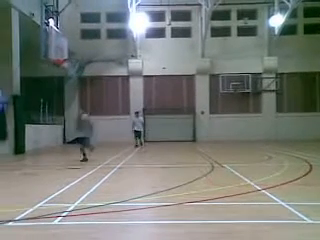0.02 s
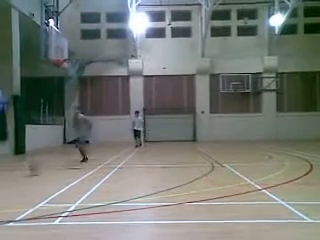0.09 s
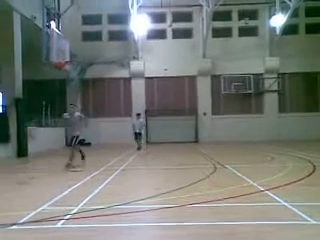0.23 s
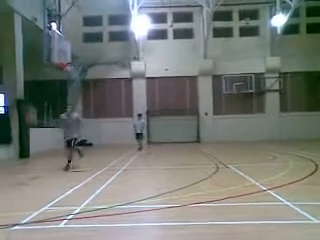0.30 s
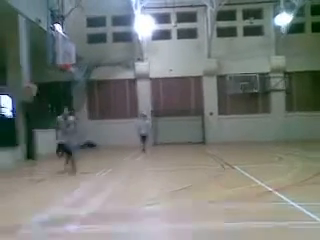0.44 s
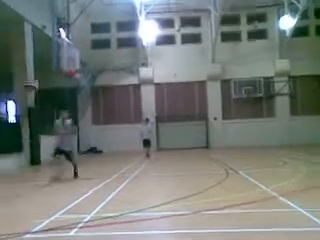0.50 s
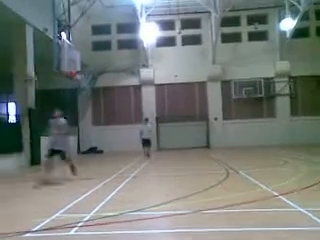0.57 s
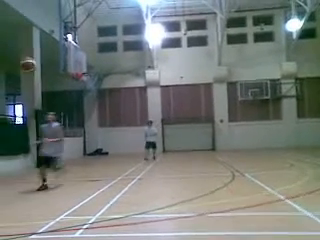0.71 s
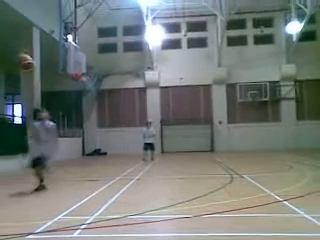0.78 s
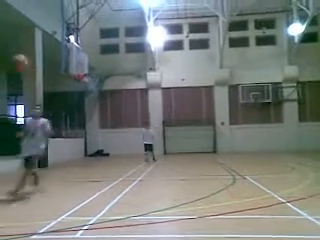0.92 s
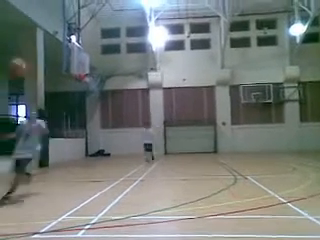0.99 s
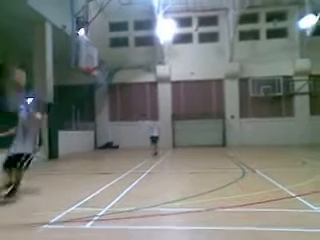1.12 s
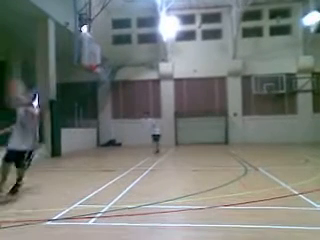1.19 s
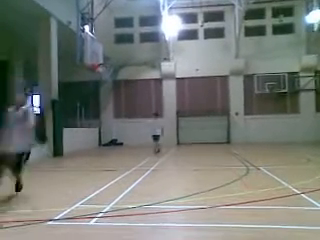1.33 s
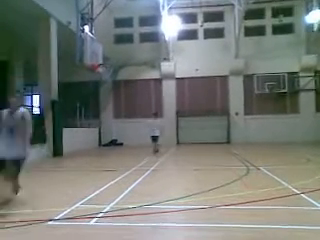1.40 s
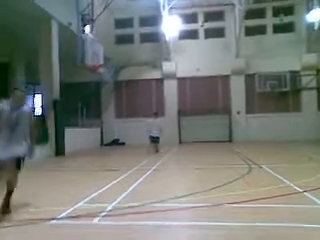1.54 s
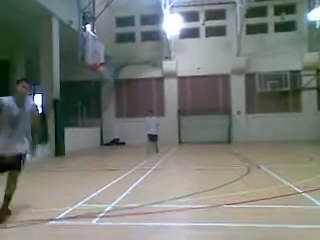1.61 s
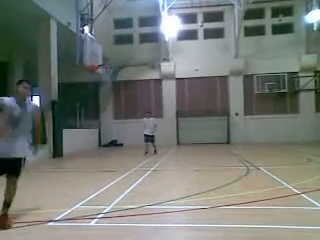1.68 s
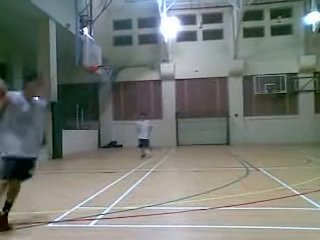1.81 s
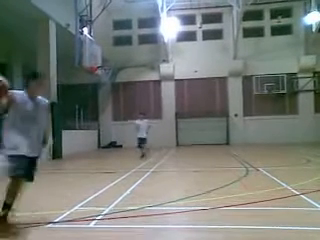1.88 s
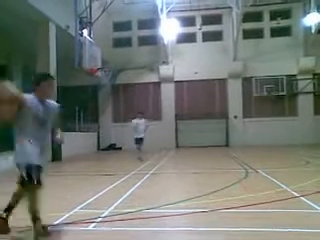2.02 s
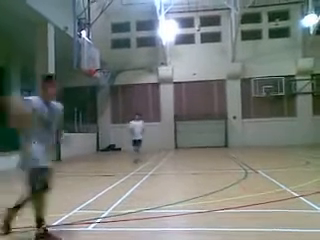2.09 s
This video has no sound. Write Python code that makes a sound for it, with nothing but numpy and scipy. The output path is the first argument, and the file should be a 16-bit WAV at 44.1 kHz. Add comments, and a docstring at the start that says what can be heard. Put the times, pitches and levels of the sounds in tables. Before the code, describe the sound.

A basketball bounces twice on a hard gym floor, with running footsteps and a shoe squeak.

```python
"""A basketball bounces twice on the hard floor of a large gym; a player runs up and a shoe squeaks.
A faint scuff, then the first bounce: noise slap, decaying-sine thump, ringing ball modes, two wall echoes.
Steps follow as noise taps, low sine thuds and board modes, with one more scuff between them.
The second bounce comes just after the last steps; then a jittered harmonic chirp with rubbing noise squeaks.
The hall, decaying noise, rings on for about two seconds; a slowly sinking noise wash lies under it all."""
import sys
import numpy as np
from scipy import signal
from scipy.fft import rfft, irfft
from scipy.io import wavfile
from scipy.ndimage import uniform_filter1d

SR = 44100
rng = np.random.default_rng(int(sys.argv[2]) if len(sys.argv) > 2 else 0)


def persist_wave(psi):
    """Save psi, clipped to +-1, as 16-bit WAV."""
    counts = np.round(np.clip(psi, -1, 1) * 32767).astype(np.int16)
    wavfile.write(sys.argv[1], SR, np.atleast_2d(counts).T)


N = 97020

# bounces: start [t/s], slap [level/dB], thump [level/dB], thump [f/Hz], ring [level/dB],
# near-wall lag [t/s], near-wall echo [level/dB], far-wall echo [level/dB],
# slap to hall [level/dB], thump to hall [level/dB]
BOUNCES = [(0.2088, -10, -5, 99.3, -26, 0.0123, -6, -9, 7.5, -1),
           (1.5314, -11.5, -7.5, 97.2, -25.5, 0.0172, -5, -22, 7, -2.5)]
# slap spectrum: [f/Hz], [level/dB]
SLAP_COLOUR = [(40, 6.5), (230, 9.5), (420, 2.5), (700, 11.5), (1100, 9), (1600, 8.5), (2700, 5.5),
               (3800, -3.5), (5600, 5.5), (7500, -1.5), (9500, -8.5)]
# modes of the ball's shell and air: [f/Hz], [level/dB], t60 [t/s]
BALL_MODES = [(237.8, 3, 0.12), (273, -6.5, 0.098), (392, -0.5, 0.1), (612, -3.5, 0.2), (699, -5.5, 0.15),
              (827, -8, 0.29), (942, -4.5, 0.12), (1010, -5.5, .25), (1054, -1, 0.12), (1144, -4, 0.21),
              (1463, -33.5, 0.32), (1664, -12, 0.16), (1787, -9.5, 0.18), (2160, -23, 0.16),
              (2710, -7.5, 0.12)]
# step contacts and their close echoes, in time order:
# start [t/s], tap [level/dB], tap decay [t/s], thud [level/dB], thud [f/Hz],
# knock [level/dB], knock low-pass [f/Hz], board ring [level/dB], send to hall [level/dB]
STEPS = [(0.755, -29.5, 0.0022, -70, 121, -57, 1000, -75, -6),
         (0.7751, -16.5, 0.0023, -50, 240, -35.5, 1500, -49, -9),
         (1.1012, -32, 0.0042, -20, 99, -18, 550, -64, -6),
         (1.114, -30.5, 0.0021, -43, 110, -34, 1500, -58, -6),
         (1.413, -28, 0.0018, -58, 120, -60, 1000, -70, -26),
         (1.4350, -13.5, 0.003, -13, 140, -15, 1800, -27, -10),
         (1.4510, -36, .003, -33, 200, -25, 2500, -29, -9),
         (1.4700, -44, .003, -29, 150, -29, 500, -37, -8)]
# sole tap spectrum: [f/Hz], [level/dB]
TAP_COLOUR = [(100, -7.5), (500, 10.5), (1200, -3.5), (1900, 8.5), (2800, -0.5), (3700, -8.5), (5600, 8),
              (7000, 2), (10000, -8.5)]
# board knock spectrum: [f/Hz], [level/dB]
KNOCK_COLOUR = [(35, 13), (110, 4.5), (260, 14), (480, 8), (750, 5), (1000, 12), (1350, 4.5), (3000, -20),
                (9000, -31)]
# modes of the floorboards: [f/Hz], [level/dB], t60 [t/s]
BOARD_MODES = [(268, 2.5, 0.1), (322.6, -4, 0.07), (926, -1, 0.079), (1099.5, 2, 0.11), (1710, -3, 0.16),
               (1838, -8.5, .1)]
# mean stick-slip rate of the sole: [t/s], [f/Hz]
SLIP_RATE = [(1.835, 930), (1.838, 965), (1.841, 996), (1.845, 1027), (1.848, 978), (1.854, 1032),
             (1.855, 1047), (1.865, 994)]
# mean levels of the slip-rate harmonics, first upward; the tread rings on every third: [level/dB]
SLIP_HARMONICS_DB = [-51, -48, -31.5, -40.5, -36, -27, -41, -46, -30]
# rubbing rubber spectrum: [f/Hz], [level/dB]
RUB_COLOUR = [(500, -14.5), (2150, -2), (2600, 7), (3100, 10), (3600, 1), (4400, -15), (5200, -11.5),
              (6100, 6), (7100, -9.5), (7900, 1), (9300, -11.5)]
# tread grabs hard and snaps free: start [t/s], [level/dB]
GRABS = [(1.8344, -20.5), (1.8537, -18.5)]
# modes of the tread: [f/Hz], [level/dB]
TREAD_MODES = [(2680, -2.5), (6350, 0)]
# distant shoe scuffs: start [t/s], decay time [t/s], [level/dB]
SCUFFS = [(0.045, 0.013, -27), (1.194, 0.017, -30)]
# hall bands, with the top band cut and shortened: [f/Hz], gain [level/dB], t60 [t/s]
HALL_BANDS = [(50, -1, 1.57), (93.6, -9, 1.13), (170, -3.5, 1.1), (344, 1.5, 1.18), (1000, 1.5, 1.77),
              (2560, 0, 1.93), (4080, -2, 1.53), (6300, -1.5, 2.15), (8440, -4, 1.36), (9620, -24.5, 0.5)]
# wash spectrum, relative: [f/Hz], [level/dB]
WASH_COLOUR = [(20, -7), (55, -2.5), (110, -2), (200, -8), (320, -12), (430, -10.5), (600, -14),
               (1100, -16), (1700, -18), (2700, -18), (3800, -35), (5800, -33.5), (7500, -34),
               (9500, -67.5)]

SLAP_DECAY_S, SHELL_DECAY_S, SHELL_DB, SHELL_LOWPASS_HZ = 0.0019, 0.015, -13.5, 2500
THUMP_LAG_S, THUMP_PEAK_S, THUMP_EXPONENT = 0.0014, 0.0065, 1.62
NEAR_WALL_HIGHPASS_HZ, FAR_WALL_LOWPASS_HZ, FAR_WALL_LAG_S = 1500, 500, 0.084
BASS_BLOOM_S, RING_HALL_DB = 0.04, -4
STEP_ATTACK_S, THUD_LAG_S, THUD_DECAY_S, KNOCK_DECAY_S = 0.00035, 0.00094, 0.0081, 0.0078
SQUEAK_START_S, SQUEAK_HOLD_S, SQUEAK_ATTACK_S, SQUEAK_RELEASE_S = 1.8345, 0.026, 0.0024, 0.007
SLIP_JITTER_RATIO, SLIP_JITTER_HZ, HARMONIC_FLUTTER_DB = 0.028, 700, 4.5
RUB_DB, GRAB_PEAK_S, SQUEAK_HALL_DB = -26, 0.0013, 2.5
SCUFF_HZ = 5700
HALL_BUILD_S, HALL_GAP_S, EARLY_DB, EARLY_DECAY_S = 0.011, 0.0075, -6.5, 0.04
WASH_DB, WASH_FADE_DB_PER_S, WASH_WAVER_DB, WASH_WAVER_HZ = -37.5, -1.5, 0.5, 12
TOP_HZ, CEILING = 10000, 0.8


def bounces():
    """Floor slap, ball-and-floor thump and ball ring, with two wall echoes; gives (direct, hall send)."""
    direct = send = 0
    for (start, slap_db, thump_db, thump_hz, ring_db, near_lag, near_db, far_db,
         hall_slap_db, hall_thump_db) in BOUNCES:
        t = since(start)
        crack = np.sign(noise()) * (t > 0) * np.exp(-t / SLAP_DECAY_S)
        crack = undb(slap_db) * colour(crack, SLAP_COLOUR)
        shell = noise() * (t > 0) * np.exp(-t / SHELL_DECAY_S)
        shell = undb(slap_db + SHELL_DB) * colour(shell, SLAP_COLOUR)
        shell = lowpass(shell, SHELL_LOWPASS_HZ, 2)

        squash = start + THUMP_LAG_S
        thump_env = swell(squash, THUMP_PEAK_S) ** THUMP_EXPONENT
        thump = -undb(thump_db) * thump_env * np.sin(2 * np.pi * thump_hz * since(squash))
        air = undb(ring_db) * ring(start, BALL_MODES)

        # near wall returns a bright slap, far wall a dull slap and thump
        near_filter = signal.butter(1, NEAR_WALL_HIGHPASS_HZ, "high", fs=SR, output="sos")
        near = undb(near_db) * signal.sosfilt(near_filter, delay(crack, near_lag))
        far = undb(far_db) * lowpass(delay(crack + thump, FAR_WALL_LAG_S), FAR_WALL_LOWPASS_HZ, 1)

        # hall gathers the slap from every side: send one smooth click; bass builds later
        click = undb(hall_slap_db) * colour(signal.unit_impulse(N, int(start * SR)), SLAP_COLOUR)
        late_thump = undb(hall_thump_db) * delay(thump, BASS_BLOOM_S)
        direct = direct + crack + shell + thump + air + near + far
        send = send + click + undb(RING_HALL_DB) * air + late_thump
    return np.array([direct, send])


def footfalls():
    """Sole taps, then weight thuds, knocks and rings the boards; gives (direct, hall send)."""
    direct = send = 0
    for (start, tap_db, tap_decay, thud_db, thud_hz, knock_db, knock_lowpass_hz,
         board_db, hall_db) in STEPS:
        tap = undb(tap_db) * colour(noise() * burst(start, STEP_ATTACK_S, tap_decay), TAP_COLOUR)
        load = start + THUD_LAG_S
        thud_env = burst(load, STEP_ATTACK_S, THUD_DECAY_S)
        thud = -undb(thud_db) * np.sin(2 * np.pi * thud_hz * since(load)) * thud_env
        knock = noise() * burst(load, STEP_ATTACK_S, KNOCK_DECAY_S)
        knock = lowpass(undb(knock_db) * colour(knock, KNOCK_COLOUR), knock_lowpass_hz, 2)
        boards = undb(board_db) * ring(load, BOARD_MODES)
        sound = tap + thud + knock + boards
        direct = direct + sound
        send = send + undb(hall_db) * sound
    return np.array([direct, send])


def squeak():
    """Rubber sticks and slips on varnish: short rough chirp, two tread grabs; gives (direct, hall send)."""
    times, rates = np.array(SLIP_RATE).T
    slip_hz = np.interp(np.arange(N) / SR, times, rates)
    slip_hz = slip_hz * (1 + SLIP_JITTER_RATIO * walk(SLIP_JITTER_HZ))
    phase = 2 * np.pi * np.cumsum(slip_hz) / SR
    tone = 0
    for harmonic, db in enumerate(SLIP_HARMONICS_DB, start=1):
        level = undb(db + HARMONIC_FLUTTER_DB * walk(SLIP_JITTER_HZ))
        tone = tone + level * np.sin(harmonic * phase)
    rub = undb(RUB_DB) * colour(noise(), RUB_COLOUR)

    attack = 1 - np.exp(-since(SQUEAK_START_S) / SQUEAK_ATTACK_S)
    release = np.exp(-since(SQUEAK_START_S + SQUEAK_HOLD_S) / SQUEAK_RELEASE_S)
    grabs = 0
    for start, db in GRABS:
        grab_env = swell(start, GRAB_PEAK_S) ** 2
        for mode_hz, mode_db in TREAD_MODES:
            mode = np.sin(2 * np.pi * mode_hz * since(start))
            grabs = grabs + undb(db + mode_db) * grab_env * mode
    sound = attack * release * (tone + rub) + grabs
    return np.array([sound, undb(SQUEAK_HALL_DB) * sound])


def scuffs():
    """Faint hiss of shoes sliding farther off: resonant noise in short bursts."""
    env = sum(undb(db) * burst(start, decay / 2, decay) for start, decay, db in SCUFFS)
    b, a = signal.iirpeak(SCUFF_HZ, 3, fs=SR)
    return env * unit(signal.lfilter(b, a, noise()))


def hall(x):
    """Sparse early reflections plus a dense tail of noise bands, the top band cut and shortened."""
    hz, db, t60 = np.array(HALL_BANDS).T
    t = since(HALL_GAP_S)
    f = np.maximum(np.fft.rfftfreq(N, 1 / SR), 1)
    spectrum, tail = rfft(noise()), 0
    # each row of eye is one band's triangular share over log frequency
    for share, band_db, decay in zip(np.eye(len(hz)), db, t60):
        env = (1 - np.exp(-t / HALL_BUILD_S)) * np.exp(-np.log(1000) * t / decay)
        band = irfft(spectrum * np.interp(np.log(f), np.log(hz), share), N)
        tail = tail + undb(band_db) * band * env / np.linalg.norm(env)
    early = noise() ** 3 * (t > 0) * np.exp(-t / EARLY_DECAY_S)  # cubing leaves sparse peaks
    early = undb(EARLY_DB) * early / np.linalg.norm(early)
    early = colour(early, list(zip(hz, db)))
    return signal.fftconvolve(x, tail + early)[:N]


def wash():
    """Diffuse hall background: coloured noise, slowly sinking and wavering slightly."""
    level_db = WASH_DB + WASH_FADE_DB_PER_S * since(0) + WASH_WAVER_DB * walk(WASH_WAVER_HZ)
    return unit(colour(noise(), WASH_COLOUR)) * undb(level_db)


def ring(start, modes):
    """Decaying sine modes struck at one moment, each with random polarity."""
    t = since(start)
    total = 0
    for hz, db, t60 in modes:
        decay = np.exp(-np.log(1000) * t / t60)
        total = total + rng.choice([-1, 1]) * undb(db) * np.sin(2 * np.pi * hz * t) * decay
    return total


def swell(start, peak):
    """Envelope that rises to one at its peak time, then falls away."""
    t = since(start) / peak
    return t * np.exp(1 - t)


def burst(start, attack, decay):
    """Envelope with a quick rise and an exponential fall."""
    t = since(start)
    return (1 - np.exp(-t / attack)) * np.exp(-t / decay)


def since(start):
    """Seconds since a moment; zero before it."""
    return np.maximum(np.arange(N) / SR - start, 0)


def delay(x, lag):
    """Same sound, lag seconds later."""
    return np.interp(np.arange(N) - np.round(lag * SR), np.arange(N), x)


def lowpass(x, hz, order):
    """Butterworth low-pass."""
    return signal.sosfilt(signal.butter(order, hz, fs=SR, output="sos"), x)


def colour(x, points, size=4096):
    """Causal minimum-phase filter through (f/Hz, level/dB) points."""
    hz, db = np.array(points).T
    f = np.maximum(np.fft.rfftfreq(size, 1 / SR), 1)
    cepstrum = irfft(np.log(undb(np.interp(np.log(f), np.log(hz), db))))
    cepstrum[1:size // 2] *= 2
    cepstrum[size // 2 + 1:] = 0
    return signal.fftconvolve(x, irfft(np.exp(rfft(cepstrum))))[:N]


def walk(hz):
    """Smooth random wander with a spread of one."""
    size = max(int(SR / hz), 1)
    return unit(uniform_filter1d(uniform_filter1d(noise(), size), size))


def noise():
    """White noise."""
    return rng.standard_normal(N)


def unit(x):
    """Scale to a standard deviation of one."""
    return x / np.std(x)


def undb(db):
    """Decibels to gain."""
    return 10 ** (np.asarray(db) / 20)


def scene():
    """Ball and shoes direct and through the hall; scuffs through the hall only; wash beneath."""
    direct, send = bounces() + footfalls() + squeak()
    return (direct + hall(send + scuffs()) + wash())[None]


def record(dry):
    """Round the loudest peaks with tanh, then cut the top steeply."""
    rounded = CEILING * np.tanh(dry / CEILING)
    return signal.sosfilt(signal.ellip(8, 0.2, 70, TOP_HZ, fs=SR, output="sos"), rounded)


dry = scene()
out = record(dry)
persist_wave(out)
```